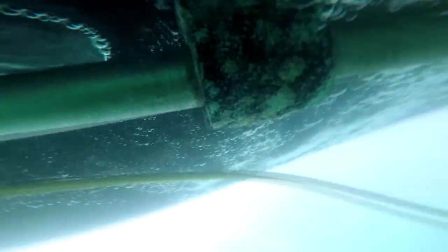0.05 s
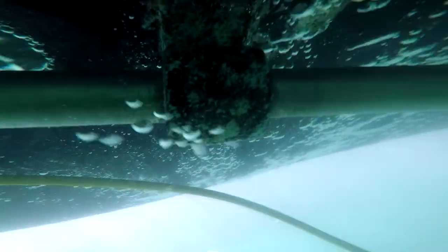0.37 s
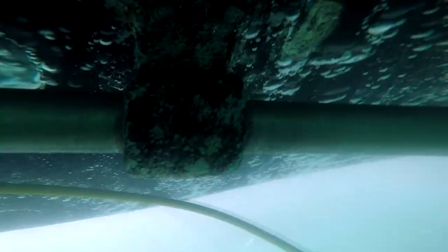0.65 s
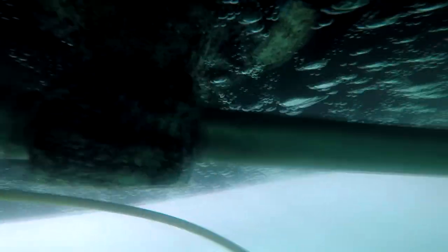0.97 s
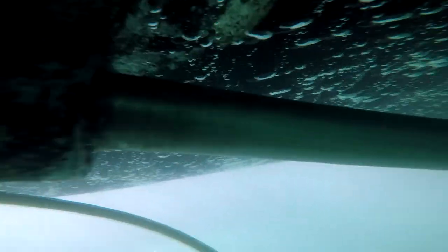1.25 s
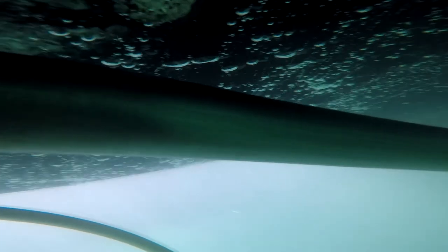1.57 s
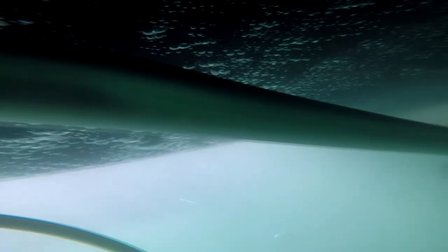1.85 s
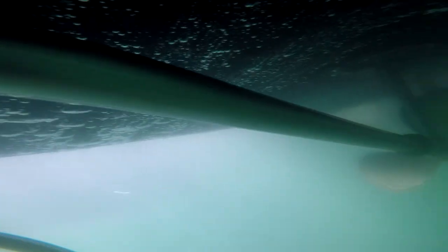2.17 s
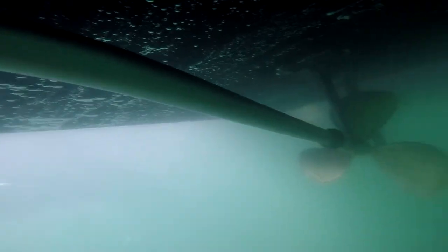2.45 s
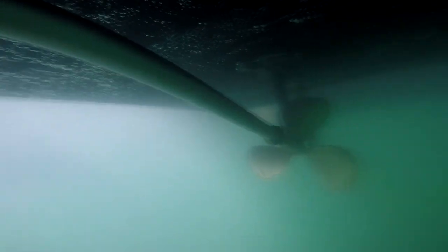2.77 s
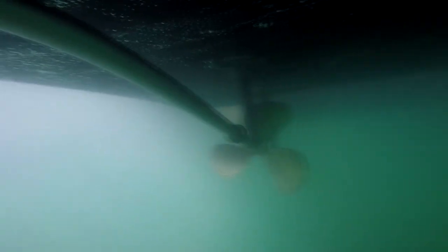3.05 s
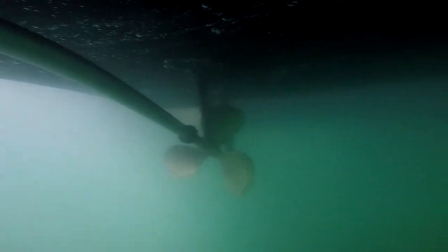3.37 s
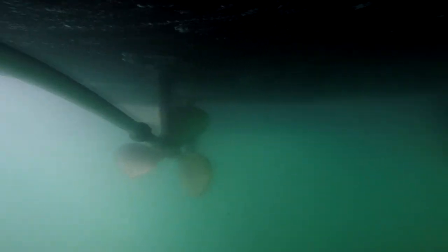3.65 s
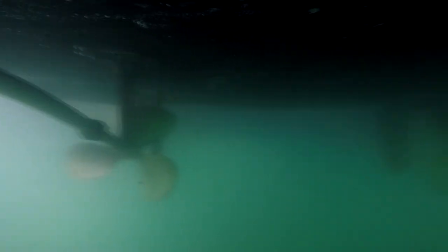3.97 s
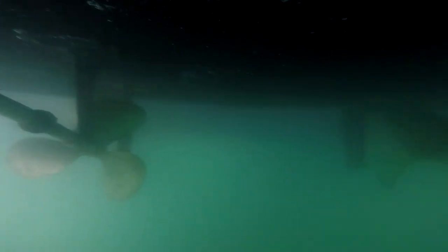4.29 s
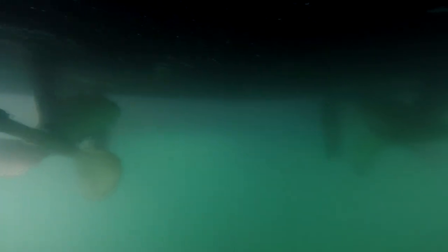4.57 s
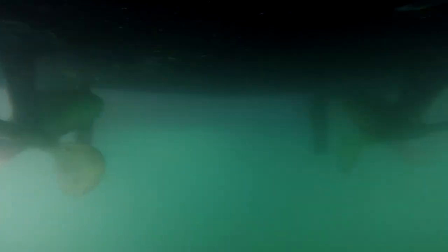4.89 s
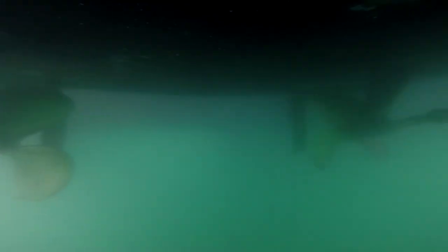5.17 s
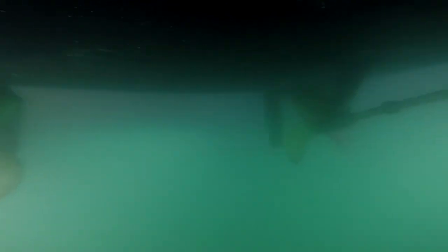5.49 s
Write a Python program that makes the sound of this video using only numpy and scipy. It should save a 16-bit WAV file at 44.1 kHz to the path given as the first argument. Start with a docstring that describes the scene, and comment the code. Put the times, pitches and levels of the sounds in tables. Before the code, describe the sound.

Underwater beneath a boat's hull, air bubbles glug and gurgle in muffled gushes over a low rumble of moving water. The deep glugs gradually give way to finer bubbling, while shrimp snaps grow from faint ticks into sharp clicks. A few dull bumps come late on. Heard from inside a waterproof camera housing, the sound starts centred and opens out to both sides halfway through.

```python
"""Muffled glugs and gurgles over a low rumble, with sharp snaps all around: a diver swims under a boat's hull,
heard from inside a waterproof camera housing. Air bubbles pulsate along the hull, shrimp snap by collapsing
cavities, and water rumbles over the housing and bumps it. The sound is centred at first, then opens out to both
sides from about 2.75 s."""
import sys
import numpy as np
from scipy import signal
from scipy.fft import rfft, irfft
from scipy.io import wavfile
from scipy.ndimage import uniform_filter1d, minimum_filter1d

SR = 44100
rng = np.random.default_rng(int(sys.argv[2]) if len(sys.argv) > 2 else 0)


def int16_out(signal):
    """Quantize to a 16-bit WAV file."""
    q = np.round(np.clip(np.atleast_2d(signal).T, -1, 1) * 32767)
    wavfile.write(sys.argv[1], SR, q.astype(np.int16))


N = 252693

# Large bubbles breaking free. Each row: start in seconds, pitch in Hz, peak in dB, swell in seconds.
GLUGS = [(0.0, 113.5, -11, 0.057), (0.369, 142.7, -8.5, 0.016), (0.5, 188, -9, 0.029),
         (0.508, 146.4, -11, 0.024), (0.529, 244.6, -7, 0.022), (0.53, 308, -9.5, 0.0077),
         (0.552, 152.4, -6.5, .048), (0.563, 262.5, -9, 0.028), (0.661, 146, -10, .023),
         (0.82, 255, -10.5, 0.012), (0.853, 221, -11, 0.011), (0.939, 216, -9.5, .012),
         (0.963, 243, -9, .017), (1.304, 255.7, -14.5, 0.024), (1.919, 161.6, -11, 0.0092),
         (2.282, 97.3, -7.5, 0.04), (2.319, 264.5, -13, 0.012), (2.331, 213.5, -12, 0.014),
         (3.712, 209, -15, 0.033), (3.79, 207.5, -12.5, 0.041), (3.861, 202, -17, 0.039)]
# Smaller bubbles passing the housing. Each row: start in seconds, pitch in Hz, peak in dB,
# swell in seconds, glide in natural-log pitch per swell.
SQUIRTS = [(1.925, 384, -17, 0.0096, -0.013), (2.127, 630, -23.5, 0.0032, 0.0064),
           (2.227, 544, -27, 0.0074, 0.014), (2.472, 668, -26, 0.0028, 0.019),
           (2.49, 594, -17.5, 0.0045, -0.12), (2.555, 715, -26.5, 0.0025, 0.013),
           (2.587, 550, -15.5, 0.0032, -0.073), (2.659, 600, -20, 0.0021, -0.14),
           (2.694, 633, -24, 0.0025, 0), (2.872, 430, -22, .012, -0.11), (2.938, 350, -17.5, 0.011, 0.0022),
           (2.942, 867, -28.5, 0.0079, -0.032), (3.05, 690, -31, 0.0047, 0.07),
           (3.294, 842, -23, 0.0069, -0.026), (3.323, 1217, -22.5, 0.0048, -0.047),
           (3.332, 830, -8.5, .0022, -0.36), (3.503, 374, -19.5, 0.008, .16),
           (4.164, 818, -23, 0.01, 0.021), (4.297, 523, -21, .0043, -0.056),
           (4.759, 1161, -14, 0.0088, -0.024), (4.774, 523, -20, .01, 0.033),
           (4.777, 940, -21, .0079, -0.0087), (4.986, 584, -23, 0.0039, -0.02)]
# Gushes of air. Each row: crest time, swell and fade in seconds, large and fine bubble levels in dB,
# large-bubble tilt in dB per octave.
GUSHES = [(0.0, .02, .05, -10.5, -54, -11), (0.39, .07, 0.059, -14, -51, -4.5),
          (0.56, 0.097, 0.13, -12.5, -41.5, -2.5), (0.852, .04, 0.059, -16.5, -43, 3),
          (0.959, .05, .07, -16, -41, -1), (1.11, .07, .11, -21, -52.5, -0.5),
          (1.34, 0.014, 0.17, -20, -44.5, 3), (1.5, .04, 0.065, -24.5, -36.5, 6.5),
          (1.58, 0.043, .15, -18, -38.5, 5.5), (1.94, 0.022, 0.062, -15.5, -57, -2.5),
          (2.039, 0.05, 0.027, -21, -45, 10.5), (2.179, 0.075, .07, -20.5, -34.5, -6),
          (2.36, .05, .11, -13.5, -44, -2), (2.5, .05, 0.045, -22, -33, 4),
          (2.599, 0.044, .04, -18.5, -44, -0.5), (2.67, 0.045, .05, -23.5, -48, 11),
          (2.89, 0.019, .04, -22.5, -39.5, 9), (2.96, .04, .1, -20, -43.5, 0.5),
          (3.331, .05, 0.025, -31.5, -37, -7.5), (3.519, 0.027, 0.089, -29, -35, 1.5),
          (3.64, 0.024, 0.11, -22.5, -34, -1.5), (3.84, .17, 0.18, -16.5, -31.5, 4.5),
          (4.071, 0.24, 0.024, -21.5, -26.5, 2), (4.289, 0.14, .13, -29, -39, -6),
          (4.78, .05, 0.037, -26, -32, -1.5), (5.17, .04, 0.036, -24, -52, 0.5),
          (5.48, 0.047, 0.077, -34.5, -43, -2), (5.64, .1, 0.13, -42, -40, -8)]
# Air between gushes. Each row: time in seconds, large and fine bubble levels in dB,
# large-bubble tilt in dB per octave.
TRICKLE = [(0, -30, -52.5, -3.5), (0.75, -23.5, -55, -0.5), (1.25, -27, -55, 0.5), (1.8, -27, -52, 2.5),
           (2.25, -35, -36, 2.5), (2.8, -35.5, -45, -5.5), (3.2, -32, -46, -7.5), (4.1, -39.5, -40.5, -14),
           (4.6, -34.5, -47, -6.5), (5.3, -47, -46, -8), (5.73, -41.5, -52, -14)]
# Fine bubbles growing finer. Each row: time in seconds, small over medium in dB, tilt in dB per octave.
FINENESS = [(0, -8, -21.5), (0.55, -12.5, -26), (1.5, -20, -28.5), (2.0, -7.5, -13), (2.5, -19, -9.5),
            (3.2, -3, -1), (4.0, -.5, -5.5), (5.73, -1, 8)]
# Bubble spectra by size, fizz the tiniest. Each row: frequency in Hz, relative level in dB.
LARGE_SPECTRUM = [(95, -2), (120, 2), (155, 2), (200, 2), (265, 1), (310, -5), (360, -17.5), (420, -22)]
MEDIUM_SPECTRUM = [(345, 3.5), (385, -3.5), (435, -3.5), (500, 7.5), (580, -0.5), (670, -9.5)]
SMALL_SPECTRUM = [(650, -6), (760, 3), (880, 1.5), (1000, -2.5), (1170, -3.5), (1320, -12), (1480, -21)]
FIZZ_SPECTRUM = [(2000, -6.5), (3300, -2), (3800, -7), (4500, 3.5), (5400, -5), (7500, -8), (10000, -14.5)]
# Bubble phase at the housing's right port. Each row: frequency in Hz, lag in radians.
PORT_LAG = [(100, 0.23), (220, 0.13), (370, 1.3), (500, 1.8), (700, 0.79), (860, 1.45), (1000, 1.75),
            (1200, 2.23), (1450, 1.84)]
# Near shrimp. Each row: start in seconds, level in dB, centre in Hz, wall and case ring in relative dB.
NEAR_SNAPS = [(0.503, -35, 9700, -23, -32.5), (0.631, -30.5, 9230, -15.5, -29),
              (1.03, -31, 9200, -22, -28.5), (1.103, -32.5, 9500, -26, -30), (1.17, -32.5, 9250, -28, -33),
              (1.179, -35, 8000, -8, -26), (1.379, -31.5, 9600, -24, -28), (1.4907, -34, 9900, -7, -26),
              (2.4456, -28, 9400, -6.5, -26), (2.933, -35, 6700, -24, -24.5), (2.9697, -32, 5200, -8, -26),
              (3.14, -27.5, 6600, -9.5, -13), (3.154, -31, 7500, -18, -26), (3.196, -34, 8100, -14, -26),
              (3.482, -16.5, 5600, 1, 2), (3.511, -26, 4390, 1, -4), (3.634, -31.5, 6200, -7, -10),
              (3.673, -17.5, 5630, -8, -2), (3.7791, -14.5, 5400, -13, -10),
              (3.8782, -19.5, 5140, -11, -26), (3.917, -28.5, 3780, -6, -26),
              (4.004, -16.5, 3600, -1, -4.5), (4.1132, -20.5, 3320, 0.5, -5), (4.169, -36, 6500, -19.5, 3),
              (4.328, -38.5, 3000, 8, -6), (4.4376, -24, 4680, -17, -17), (4.727, -35.5, 4990, -24, -26),
              (4.7728, -23.5, 4320, -6.5, -24), (4.7873, -30.5, 6540, -9, -26),
              (4.8535, -21.5, 6260, -3.5, -3), (4.901, -24.5, 6860, -10, -17), (4.9435, -34, 3250, 4, -3),
              (5.043, -24.5, 3920, -1.5, 1.5), (5.2568, -33.5, 4610, -6.5, -26),
              (5.383, -28.5, 5350, -5, -13), (5.5886, -29.5, 4800, -0.5, -4), (5.65, -37, 3470, 3, -26)]
# Far shrimp. Each row: time in seconds, base level in dB, centre in Hz.
FAR_CRACKLE = [(0, -55, 7420), (1.2, -50.5, 7430), (2.7, -45.5, 7200), (3.3, -47, 5500), (4.0, -38.5, 4540),
               (4.5, -46.5, 4650), (5.73, -41, 4700)]
# Housing modes, of the whole case and of its walls. Each row: frequency in Hz, level in dB,
# T60 in seconds, right-port gain (negative in antiphase).
CASE_MODES = [(845, -3, 0.073, 0.37), (1113, 0.5, .04, -0.061), (1325, -2, 0.033, -0.21)]
WALL_MODES = [(1550, -10.5, .016, -1), (1900, -11, 0.02, -2), (2254, -11.5, 0.033, 0.37),
              (2430, -16.5, 0.018, 2.3), (3130, -14, 0.022, 1.1), (3327, -14.5, 0.035, 0.35),
              (4320, -15, 0.019, 0.64), (5350, -15, .01, -0.063), (5870, -15.5, 0.013, 0.51)]
# Bumps on the housing. Each row: start in seconds, level in dB, pitch in Hz.
BUMPS = [(4.208, -6.5, 44.3), (4.272, -11.5, 109), (4.313, -11, 140), (4.36, -13.5, 55), (4.412, -8.5, 90),
         (4.442, -16.5, 135), (4.472, -24, 100), (5.166, -31, 90)]
# Flow over the housing. Each row: time in seconds, level in dB.
FLOW_LEVEL = [(0.0, -19), (0.13, -19), (0.3, -26), (0.41, -19), (0.88, -32), (0.89, -26), (2.14, -28),
              (2.3, -22.5), (2.76, -30), (3.05, -24), (3.13, -31), (4.44, -24), (4.66, -30), (4.88, -24),
              (4.95, -34), (5.07, -24), (5.59, -25), (5.73, -38)]
# Background hiss. Each row: time in seconds, dull rush in dB, distant sizzle in dB.
HISS_LEVELS = [(0, -56.5, -62.5), (0.45, -53.5, -60), (0.8, -60, -66), (1.45, -55, -60), (2.45, -54, -60.5),
               (3.45, -59, -61), (3.96, -53, -57.5), (4.5, -60, -59), (4.9, -57, -58), (5.73, -63, -61)]
# Noise spectra. Each row: frequency in Hz, relative density in dB.
FLOW_SPECTRUM = [(12, -23), (22, 0), (36, 4), (52, -4.5), (72, -3), (100, -6.5), (150, -25.5), (300, -31.5)]
RUSH_SPECTRUM = [(400, -2.5), (800, 0), (1300, 1.5), (1700, -2), (2250, -5.5), (2800, -14.5), (4000, -44.5)]
SIZZLE_SPECTRUM = [(1800, -3.5), (2700, 2), (3200, 0.5), (3700, -1.5), (4500, 3), (5000, 0), (5800, 1),
                   (7300, -1.5), (10300, -1), (11800, -11.5), (13500, -15.5), (14800, -35.5)]
# Stereo image. Each row: time in seconds, width from 0 to 1, side gain of the flow in dB.
SPREAD = [(0, 0, -20), (2.74, 0, -17), (2.95, 0.67, -7.5), (3.5, 1, -11), (4.2, 0.98, -5), (5.1, 1, -6.5),
          (5.73, 1, -10.5)]


def near_bubbles(squirt_lag_turns=0.35):
    """Single bubbles: centred glugs, and squirts that reach the right port late."""
    out = np.zeros((2, N))
    for start_s, hz, db, swell_s in GLUGS:
        wave = from_db(db) * bubble(hz, swell_s, glide=0.014).real
        add(out, start_s, mid_side(wave, wave))
    for start_s, hz, db, swell_s, glide in SQUIRTS:
        wave = from_db(db) * bubble(hz, swell_s, glide)
        lagged = wave * np.exp(-2j * np.pi * squirt_lag_turns)
        add(out, start_s, mid_side(wave.real, lagged.real))
    return out


def bubble(hz, swell_s, glide):
    """One pulsation swells and dies as its pitch glides; complex, peak 1, random phase."""
    age = np.arange(int(7 * swell_s * SR) + 2) / (swell_s * SR)
    turns = np.cumsum(hz * np.exp(glide * age)) / SR + rng.random()
    return age ** 2 * np.exp(2 - 2 * age) * np.exp(2j * np.pi * turns)


def bubble_clouds(fizz_db=-27):
    """Large bubbles gurgle, finer ones burble, the tiniest merge into a fizz of noise."""
    large_gain, fine_gain, large_tilt = air_release()
    small_db, fine_tilt = in_time(FINENESS)
    large = swarm(LARGE_SPECTRUM, large_tilt, per_s=260, swell_cycles=2.67, size_db=1.5,
                  scatter_rad=0.35, left_db=-1.5, span_s=0.033)
    medium = swarm(MEDIUM_SPECTRUM, fine_tilt, per_s=450, swell_cycles=1.78, size_db=3.0,
                   scatter_rad=1.81, left_db=-3.5, span_s=0.064)
    small = swarm(SMALL_SPECTRUM, fine_tilt, per_s=1000, swell_cycles=2.6, size_db=2.5,
                  scatter_rad=0.64, left_db=2.0, span_s=0.1)
    fizz = from_db(fizz_db) * noise(FIZZ_SPECTRUM)
    return large_gain * large + fine_gain * (medium + from_db(small_db) * (small + fizz))


def air_release(drop_db=10.5, roundness=1.26):
    """Air gushes over a trickle; returns large gain, fine gain and power-weighted large-bubble tilt."""
    t = np.arange(N) / SR
    large_db, fine_db, tilt = in_time(TRICKLE)
    large_power, fine_power = from_db(large_db) ** 2, from_db(fine_db) ** 2
    tilt_sum = large_power * tilt
    for crest_s, swell_s, fade_s, large_db, fine_db, tilt in GUSHES:
        from_crest = np.maximum((crest_s - t) / swell_s, (t - crest_s) / fade_s)
        shape_db = -drop_db * np.minimum(from_crest, 10) ** roundness
        gush_power = from_db(large_db + shape_db) ** 2
        large_power += gush_power
        fine_power += from_db(fine_db + shape_db) ** 2
        tilt_sum += gush_power * tilt
    return np.sqrt(large_power), np.sqrt(fine_power), tilt_sum / large_power


def swarm(spectrum, tilt_db_per_oct, per_s, swell_cycles, size_db, scatter_rad, left_db, span_s):
    """Bubbles of random size, pitch and place, each rising slightly in pitch; level evened out."""
    out = np.zeros((2, N))
    low_hz, high_hz = spectrum[0][0], spectrum[-1][0]
    for when, pitch, size, life, place in rng.random((int(per_s * N / SR), 5)):
        hz = low_hz * (high_hz / low_hz) ** pitch
        octaves = np.log2(hz / np.sqrt(low_hz * high_hz))
        colour_db = at_hz(spectrum, hz) + tilt_db_per_oct[int(when * N)] * octaves
        gain = from_db(colour_db - size_db * np.log(size + 0.02)) * hz / low_hz
        wave = gain * bubble(hz, swell_cycles * (0.5 + life) / hz, glide=0.025)
        lag_rad = at_hz(PORT_LAG, hz) + scatter_rad * (2 * place - 1)
        lagged = wave * np.exp(-1j * lag_rad)
        add(out, when * N / SR, mid_side(from_db(left_db) * wave.real, lagged.real))
    return steady(out, span_s)


def shrimp(far_per_s=36, range_db=8):
    """Near snaps one by one, over a random crackle of far ones."""
    out = np.zeros((2, N))
    for start_s, db, hz, walls_db, case_db in NEAR_SNAPS:
        add(out, start_s, snap(db, hz, walls_db, case_db))
    far_db, far_hz = in_time(FAR_CRACKLE)
    for when, size, pitch in rng.random((int(far_per_s * N / SR), 3)):
        i = int(when * N)
        db = far_db[i] + range_db * size ** 3
        hz = far_hz[i] * 2 ** (pitch - 0.5)
        add(out, i / SR, snap(db, hz, walls_db=-3.5, case_db=-20))
    return out


def snap(db, hz, walls_db, case_db, crack_t60_s=0.0062, echo_db=-27, echo_t60_s=0.23,
         width_hz=2600, skirt_db=-7, skirt_oct=0.95):
    """A cavity collapses: pitched crack, scattered echoes off the hull, ring of the housing."""
    t = np.arange(SR // 12) / SR
    mid, side = rng.standard_normal((2, len(t)))
    fade = from_db(-60 * t / crack_t60_s) + from_db(echo_db - 60 * t / echo_t60_s)
    burst = left_right(mid, from_db(-8.5) * side) * fade
    core = band(burst, hz - width_hz / 2, hz + width_hz / 2, order=2)
    skirts = band(burst, hz / 2 ** skirt_oct, hz * 2 ** skirt_oct, order=1)
    crack = band(core + from_db(skirt_db) * skirts, 1800, 11300, order=2)
    crack = crack / np.abs(crack).max() * from_db([[-2], [2]])   # leans right
    walls = from_db(walls_db) * housing_ring(WALL_MODES, t)
    case = from_db(case_db) * housing_ring(CASE_MODES, t)
    return from_db(db) * mid_side(*(crack + walls + case))


def housing_ring(modes, t, scatter_db=2.4):
    """Struck modes at the left and right port; strength and sign vary per blow."""
    out = 0
    for hz, db, t60_s, right_gain in modes:
        strength = from_db(db + rng.normal(0, scatter_db)) * rng.choice([-1, 1])
        mode = from_db(-60 * t / t60_s) * np.sin(2 * np.pi * hz * t)
        out = out + strength * np.outer([1, right_gain], mode)
    return out


def bumps(t60_s=0.039, attack_s=0.0023, side_db=-7):
    """Eddies push the housing, which heaves briefly."""
    out = np.zeros((2, N))
    t = np.arange(SR // 8) / SR
    for start_s, db, hz in BUMPS:
        envelope = 2 * from_db(db - 60 * t / t60_s) * (1 - np.exp(-t / attack_s))
        heave = envelope * np.sin(2 * np.pi * hz * t)
        side_gain = from_db(side_db) * rng.choice([-1, 1])
        add(out, start_s, np.outer([1, side_gain], heave))
    return out


def water_flow(side_db):
    """Water rumbles over the housing."""
    level_db, = in_time(FLOW_LEVEL)
    flow = from_db(level_db) * steady(noise(FLOW_SPECTRUM), span_s=0.082)
    flow[1] *= from_db(side_db)
    return flow


def hiss(rush_side_db=6, sizzle_side_db=-3):
    """A dull rush and a distant sizzle."""
    rush_db, sizzle_db = in_time(HISS_LEVELS)
    rush = from_db(rush_db) * noise(RUSH_SPECTRUM)
    rush[1] *= from_db(rush_side_db)
    sizzle = from_db(sizzle_db) * noise(SIZZLE_SPECTRUM)
    sizzle[1] *= from_db(sizzle_side_db)
    return rush + sizzle


def noise(spectrum):
    """Coloured mid and side noise, falling steeply past the spectrum's ends; rms 1."""
    hz = np.arange(N // 2 + 1) * SR / N + 1e-3
    skirts = np.minimum(1, hz / spectrum[0][0]) ** 2 * np.minimum(1, spectrum[-1][0] / hz) ** 4
    white = rfft(rng.standard_normal((2, N)))
    x = irfft(white * from_db(at_hz(spectrum, hz)) * skirts, N)
    return x / np.sqrt(np.mean(x ** 2) + 1e-20)


def steady(x, span_s):
    """Even out a mid-side pair's slow level, keeping its grain; mid rms near 1."""
    size = max(int(span_s * SR), 2)
    power = uniform_filter1d(uniform_filter1d(x[0] ** 2, size), size)
    return x / np.sqrt(np.abs(power) + 0.02 * power.mean())


def band(x, low_hz, high_hz, order):
    """Band-pass."""
    edges_hz = np.clip([low_hz, high_hz], 300, 0.45 * SR)
    return signal.sosfilt(signal.butter(order, edges_hz, "band", fs=SR, output="sos"), x)


def from_db(db):
    """Decibels to gain."""
    return 10 ** (np.asarray(db) / 20)


def in_time(rows):
    """Each column of a time curve, per sample."""
    times_s, *columns = np.transpose(rows)
    return [np.interp(np.arange(N) / SR, times_s, column) for column in columns]


def at_hz(points, hz):
    """Interpolate on a log-frequency axis."""
    points_hz, values = np.transpose(points)
    return np.interp(np.log(hz + 1e-3), np.log(points_hz), values)


def add(out, start_s, sound):
    """Mix a two-row sound into out."""
    start = int(np.clip(start_s * SR, 0, N - 1))
    out[:, start:start + sound.shape[1]] += sound[:, :N - start]


def mid_side(left, right):
    """Left and right to mid and side."""
    return np.array([left + right, left - right]) / 2


def left_right(mid, side):
    """Mid and side to left and right."""
    return np.array([mid + side, mid - side])


def scene():
    """Sources summed as mid and side; the image opens from mono to stereo."""
    width, flow_side_db = in_time(SPREAD)
    background = water_flow(flow_side_db) + hiss()
    mid, side = background + bumps() + near_bubbles() + bubble_clouds() + shrimp()
    return left_right(mid, width * side)


def record(dry, ceiling=0.92, stopband_hz=16200):
    """Smooth peak limiter, then a steep low-pass."""
    size = SR // 140   # about 7 ms
    allowed = np.minimum(1, ceiling / (np.abs(dry).max(axis=0) + 1e-9))
    held = minimum_filter1d(allowed, 2 * size)
    gain = uniform_filter1d(uniform_filter1d(held, size), size)
    return signal.sosfilt(signal.cheby2(12, 60, stopband_hz, fs=SR, output="sos"), dry * gain)


dry = scene()
out = record(dry)
int16_out(out)
```